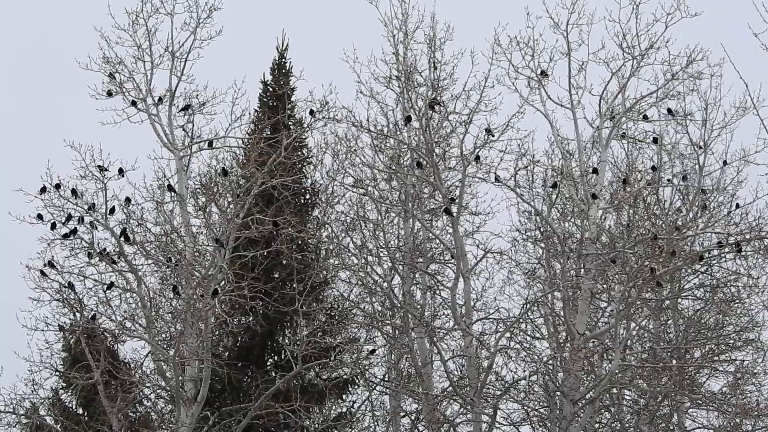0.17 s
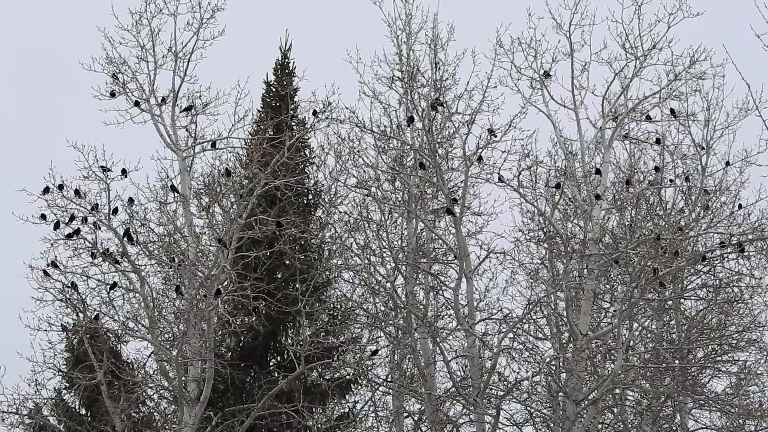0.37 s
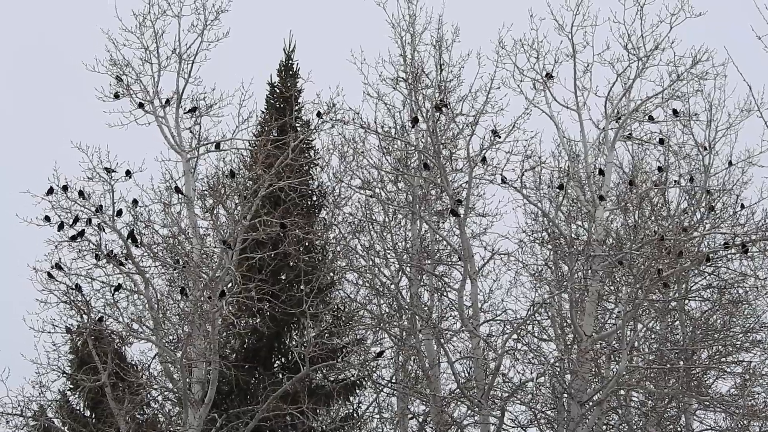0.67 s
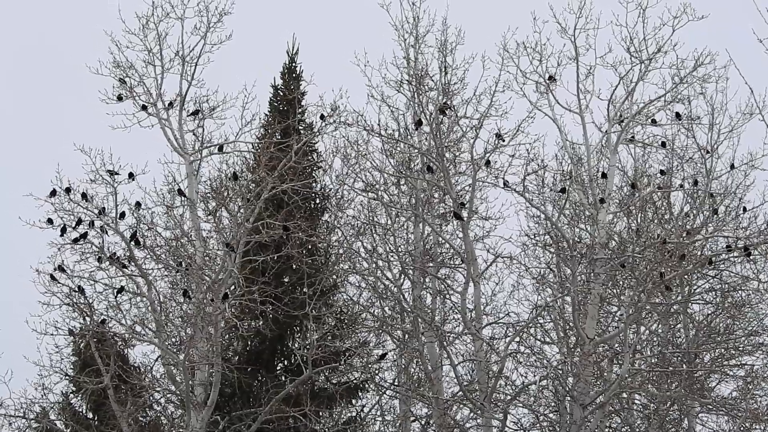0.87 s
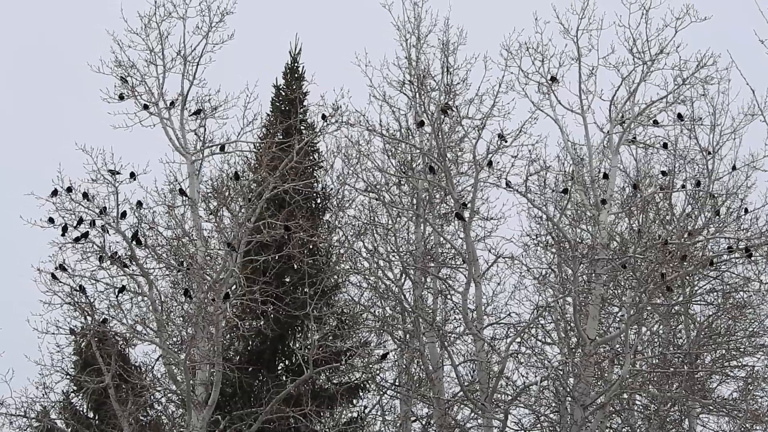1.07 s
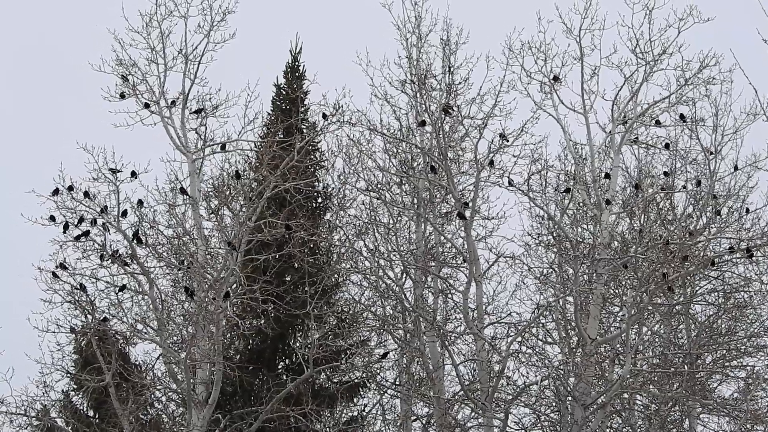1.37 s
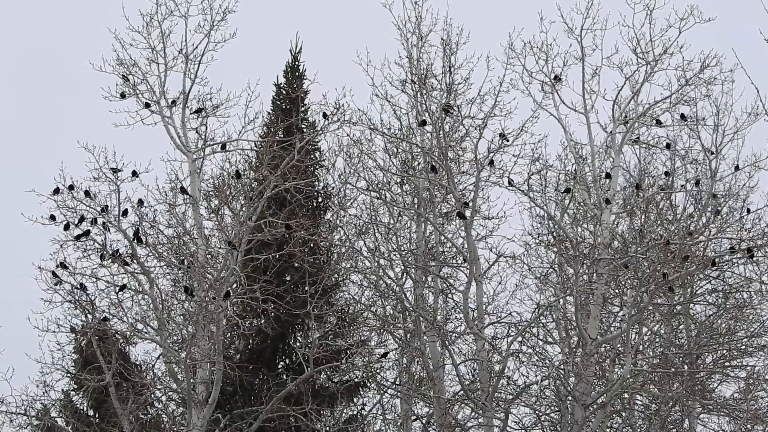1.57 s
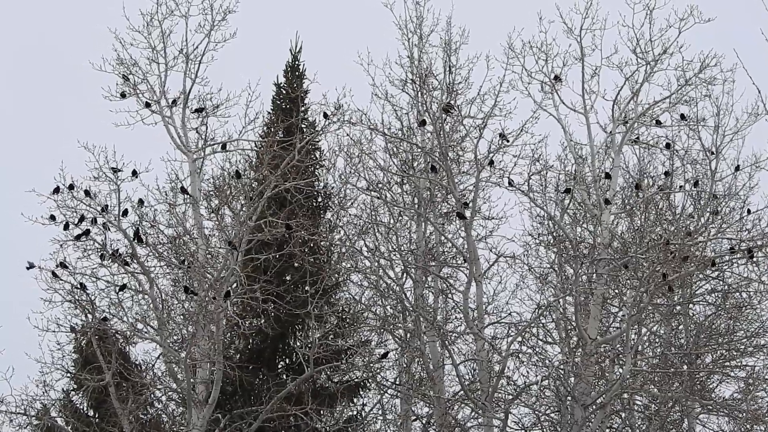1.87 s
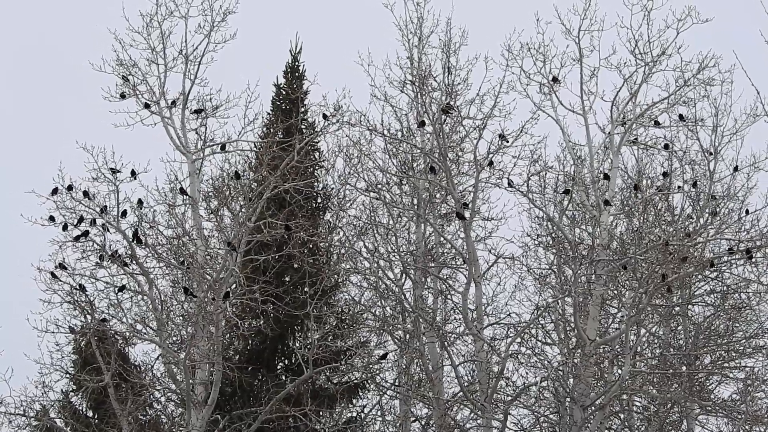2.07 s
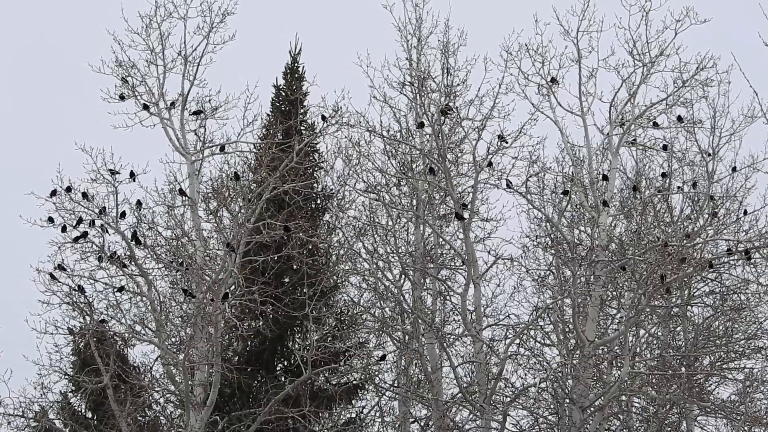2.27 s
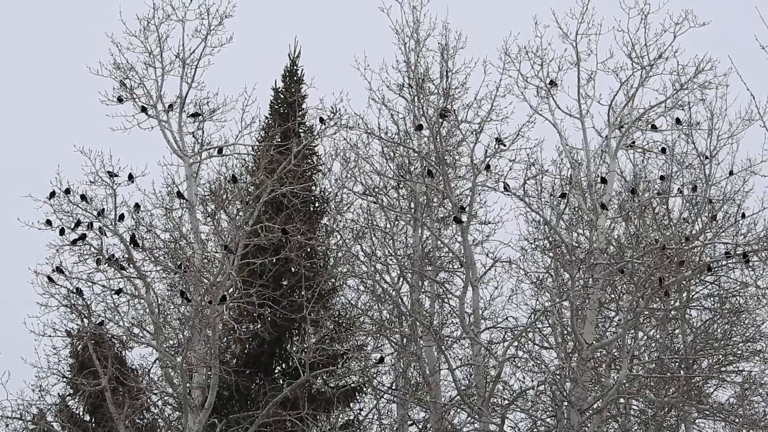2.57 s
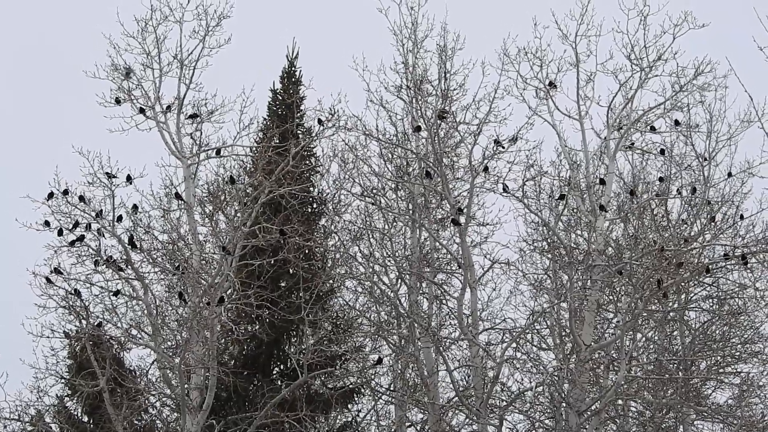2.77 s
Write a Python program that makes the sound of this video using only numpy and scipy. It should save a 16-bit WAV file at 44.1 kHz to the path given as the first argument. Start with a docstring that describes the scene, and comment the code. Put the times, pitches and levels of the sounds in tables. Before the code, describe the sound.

A dense blackbird flock chatters throughout, opening abruptly after a tiny silence. Sharp chips and liquid notes come first; overlapping falling whistles and rasps crowd 0.3-1.15 seconds. From 1.2 to 1.9 it thins to scattered pips and thin high rising whistles. Around 2.0 a rattle and rasps lead into a rapid trill until 2.5, then more slurred whistles near 2.6-2.9. Far chorus, short tree echoes and faint low rumble continue underneath.

```python
"""Blackbirds chattering in bare trees

A flock of blackbirds chatters some way from the microphones. Near birds slur, whistle, gurgle, pip
and trill in wavering tones with weak overtones; rasps are rows of ringing clicks, rattles fast chips.
Other birds call at random, the branches scatter the calls into short echoes, and the farthest voices
blur into a chorus of shaped noise. A faint distant rumble, also shaped noise, lies underneath.
"""
import sys
import numpy as np
from scipy import signal
from scipy.fft import rfft, irfft
from scipy.io import wavfile
from scipy.ndimage import uniform_filter1d

SR = 44100
rng = np.random.default_rng(int(sys.argv[2]) if len(sys.argv) > 2 else 0)


def wav_record(signal):
    """Record a signal, one row per channel, as 16-bit PCM in the file named by sys.argv[1]."""
    frames = np.transpose(np.atleast_2d(signal))
    bounded = np.clip(frames, -1, 1)
    # unit amplitude maps onto the largest positive 16-bit level
    quanta = np.round(bounded * 32767).astype(np.int16)
    wavfile.write(sys.argv[1], SR, quanta)


N = 129213  # length of the sound in samples

# All levels in the tables are relative ones, before the fades and the final mix.
# Bearing runs from -1 to 1; a positive one reaches the left microphone first.

# Long whistles, mostly falling: start_s, length_s, start_pitch_hz, knee_pitch_hz, middle_pitch_hz,
# end_pitch_hz, level_db, bearing
SLUR_WHISTLES = [(.272, .235, 4800, 3660, 3250, 3037, -29.5, -0.38),
                 (.325, .19, 4450, 4130, 3930, 3600, -28, .2),
                 (.503, .2, 3640, 3420, 3280, 3170, -27, 0.31),
                 (.685, 0.13, 4950, 4150, 3015, 2900, -27.5, 0),
                 (.781, .085, 4380, 4050, 3800, 3180, -26.5, -.4),
                 (.84, .065, 4900, 4600, 4250, 3850, -32, .2),
                 (.858, .05, 3380, 3340, 3300, 3200, -31.5, -.4),
                 (.897, .11, 4030, 3550, 3230, 2950, -26.5, 0),
                 (.972, .175, 3600, 3520, 3270, 3100, -26.5, .1),
                 (1.03, .1, 2900, 2870, 2800, 2733, -35, 0), (2.025, 0.1, 3770, 3520, 3110, 3006, -34, 0),
                 (2.12, 0.22, 3700, 3370, 3020, 2733, -30.5, .2),
                 (2.452, 0.0494, 3690, 3440, 3265, 3080, -35, -0.082),
                 (2.605, .17, 3640, 3430, 3300, 3320, -29, .1),
                 (2.656, .27, 5980, 4380, 4030, 3850, -28.5, -0.24),
                 (2.805, .06, 3900, 3520, 3230, 2950, -31.5, 0)]
# Thin high whistles, rising or falling: start_s, length_s, start_pitch_hz, knee_pitch_hz,
# middle_pitch_hz, end_pitch_hz, level_db, bearing
THIN_WHISTLES = [(.44, 0.32, 7750, 7260, 6850, 6400, -49, 0),
                 (.585, .245, 8200, 7880, 7600, 6950, -48.5, -.6),
                 (.85, 0.09, 7400, 7200, 7500, 7850, -49, -0.069),
                 (1.228, .1, 6400, 6900, 7280, 7450, -41.5, 0.4),
                 (1.328, .19, 6950, 7580, 7740, 7840, -37.5, 0.85),
                 (1.58, 0.099, 7950, 7800, 7550, 6900, -50, 0.068),
                 (1.84, 0.093, 5680, 5690, 5700, 5720, -37.5, 0.62),
                 (2.02, .28, 6800, 7170, 7560, 7970, -42.5, 0.5),
                 (2.8, 0.16, 6750, 6930, 7320, 7600, -38, -0.33)]
# Liquid notes, mostly low: start_s, length_s, pitch_hz, glide_octaves, level_db
LIQUID_NOTES = [(.06, .14, 2490, .03, -36.5), (.05, .16, 4950, 0, -33.5), (.085, 0.044, 1520, -0.11, -39),
                (.135, 0.067, 1360, -0.002, -41), (.22, 0.048, 2313, -0.056, -34),
                (.235, .075, 1350, -.1, -42), (.305, 0.12, 1421, -0.017, -37.5),
                (.35, 0.13, 1707, -0.0093, -44), (.7, .085, 1350, -0.061, -44),
                (.805, 0.027, 1290, 0.046, -45), (.91, 0.032, 1380, 0.026, -41),
                (.962, 0.037, 2200, -0.15, -29), (.995, 0.065, 2163, -0.013, -32.5),
                (1.07, 0.1, 1490, .15, -46), (1.155, 0.08, 2750, -0.016, -40.5),
                (1.183, 0.027, 2314, 0.072, -31), (1.31, 0.11, 1395, -.03, -46.5),
                (1.355, 0.034, 1610, 0.018, -45), (1.41, 0.075, 2213, -0.033, -36),
                (1.73, 0.061, 1413, 0.077, -48), (1.793, 0.037, 1843, .02, -38),
                (1.83, .12, 1915, .02, -48), (1.958, 0.019, 2174, 0.05, -31),
                (1.988, .025, 1814, 0.059, -37.5), (2.17, .06, 1665, -.06, -39),
                (2.23, 0.13, 1305, 0.03, -46), (2.23, 0.13, 1030, 0.066, -48.5),
                (2.425, .042, 2144, .02, -34.5), (2.437, .04, 1708, .03, -39.5), (2.49, .022, 2110, 0, -34),
                (2.553, .05, 1385, .02, -38), (2.605, .04, 1445, .05, -43),
                (2.705, 0.028, 2256, -0.077, -32.5), (2.812, 0.024, 1840, 0.02, -35),
                (2.823, .045, 1670, 0, -42)]
# Short pips and sharp chips: start_s, length_s, pitch_hz, glide_octaves, level_db
PIP_NOTES = [(.056, .008, 4980, -.1, -28), (.063, .014, 4570, -.03, -23.5), (.078, .008, 4850, .1, -25.5),
             (.082, .009, 3450, -.1, -28), (.085, .008, 4600, 0, -28), (.11, .022, 6450, .04, -36),
             (.11, .03, 3240, .06, -30), (.156, 0.0093, 5620, -0.33, -33), (.184, 0.019, 3260, 0.25, -27),
             (.248, 0.013, 3130, 0.16, -24.5), (.266, .011, 5400, -.4, -26), (.41, .032, 3150, -.02, -25.5),
             (.426, .01, 6530, -.25, -33), (.675, .014, 6120, -0.058, -26.5),
             (.721, 0.011, 4680, -0.031, -21.5), (.742, .03, 3040, -.04, -26),
             (.751, 0.0094, 6100, -0.2, -32), (.812, .012, 4500, -.45, -29), (.884, .011, 5700, -.4, -31),
             (.759, 0.0089, 4620, 0, -25.5), (.785, 0.042, 5650, -.08, -32), (.919, .013, 5580, .12, -26),
             (.929, .015, 5530, -.16, -27), (.951, .015, 5480, .08, -33), (.996, 0.019, 5620, -.07, -31),
             (1.018, .014, 5200, -0.19, -27), (1.06, .025, 3230, -0.0028, -27),
             (1.253, 0.025, 3120, -0.065, -29), (1.475, 0.029, 4740, 0, -31.5),
             (1.523, 0.0096, 5600, .2, -30), (1.542, .02, 3540, 0.09, -22.5),
             (1.61, 0.017, 4870, -0.012, -33), (1.647, 0.011, 5580, -0.43, -31),
             (1.688, 0.019, 3500, 0.094, -26.5), (1.837, 0.02, 3490, 0.035, -26.5),
             (1.945, 0.015, 3600, 0.071, -37), (1.996, .018, 7340, .17, -36),
             (1.979, .008, 4750, -.35, -28), (2.004, .011, 4620, -0.066, -25.5),
             (2.085, 0.0089, 5800, -0.31, -31), (2.183, .012, 6600, .35, -36),
             (2.25, .008, 5540, 0.23, -28), (2.352, 0.0091, 6360, .2, -38), (2.475, 0.014, 6400, .2, -35),
             (2.526, .009, 6200, -0.28, -37), (2.603, 0.01, 6880, 0.067, -37),
             (2.606, .016, 4720, 0, -27.5), (2.652, .014, 5680, .04, -29)]
# One bird's trill of hooked, slightly hoarse notes: start_s, length_s, pitch_hz, level_db
TRILL_NOTES = [(2.114, .015, 5200, -27.5), (2.136, .013, 4650, -27), (2.16, .014, 4900, -27),
               (2.185, .013, 5050, -28), (2.21, .014, 4700, -29), (2.236, .015, 4650, -25),
               (2.263, .015, 4620, -25.5), (2.292, .012, 4620, -27), (2.317, .017, 4660, -25),
               (2.347, .026, 4850, -29), (2.374, .013, 4850, -29.5), (2.401, .017, 4750, -31),
               (2.426, .011, 4900, -31), (2.456, .011, 4750, -32), (2.481, .013, 4680, -30)]
# Rattles, fast runs of steep downward chips: start_s, length_s, centre_hz, chips_per_s, level_db
RATTLE_RUNS = [(.085, .065, 4100, 120, -35.5), (2.02, .07, 4200, 106, -32.5)]
# Harsh rasps: start_s, length_s, centre_hz, spread_octaves, clicks_per_s, level_db
RASP_CALLS = [(.52, .22, 2500, .1, 170, -38), (0.792, .11, 4700, 0.11, 136, -36),
              (0.898, 0.14, 3210, .12, 133, -32.5), (2.0, .115, 4650, .03, 134, -32.5),
              (2.11, 0.11, 3400, 0.046, 143, -42), (2.14, .14, 5200, .13, 120, -38),
              (2.41, 0.072, 3400, 0.17, 125, -36.5), (2.854, 0.093, 3070, 0.14, 140, -33)]
# Groups of birds in the unseen flock: calls_per_s, pitch_hz, spread_octaves, length_s,
# glide_octaves, level_db
FLOCK_GROUPS = [(54.96, 3250, 0.1204, 0.01764, 0.16, -37), (39.6, 4780, 0.053, 0.0123, 0.093, -35.5),
                (60, 5600, 0.133, 0.01007, 0.233, -38.5), (19.95, 2450, .12, .025, 0.1, -41),
                (7.95, 1450, 0.23, .05, 0.079, -49.5), (14, 6800, .06, 0.0117, .12, -46.5)]
# Tone colour of the far chorus: frequency_hz, level_db_per_hz
CHORUS_COLOUR = [(700, -41), (1200, -15.5), (1800, -13.5), (2300, -7.5), (2700, -5), (3200, -0.5),
                 (3550, -2), (4000, -8), (4400, -5), (4800, -5), (5300, -11.5), (6400, -12), (7200, -23.5),
                 (8300, -31.5), (9500, -41), (12000, -45), (15500, -53)]
# Swells of the far chorus: time_s, middle_band_db, treble_db
CHORUS_SWELLS = [(.05, -32.5, -31), (.21, -36.5, -41.5), (.3, -33.5, -34), (.47, -35.5, -38.5),
                 (.6, -32.5, -33), (.72, -32, -35.5), (.85, -30.5, -32), (1.0, -31.5, -31),
                 (1.1, -34, -36.5), (1.22, -36.5, -39), (1.33, -35, -33), (1.45, -34, -37.5),
                 (1.64, -34.5, -32), (1.76, -36, -40.5), (1.83, -34, -33), (1.92, -36.5, -35.5),
                 (2.07, -33, -33), (2.3, -33, -37.5), (2.46, -32.5, -34.5), (2.57, -31.5, -38),
                 (2.75, -36.5, -32), (2.92, -29, -37)]
# Tone colour of the rumble: frequency_hz, level_db_per_hz
RUMBLE_COLOUR = [(15, -62), (25, -31), (59, -7.5), (139, -6), (172, -0.5), (216, 0.5), (368, -5.5),
                 (461, -5.5), (500, -6), (638, -7), (911, -13.5), (1200, -18), (1560, -24), (2640, -120)]
# How alike the left and right noise are: frequency_hz, likeness (1 = the same)
LEFT_RIGHT_LIKENESS = [(30, .75), (70, 0.93), (150, 0.99), (400, 1), (800, 0.94), (2500, 0.91),
                       (3500, 0.92), (5000, 0.74), (8000, 0.3), (12000, 0.4)]

EAR_GAP_S = 3e-5  # arrival difference between the microphones for a bird at the side
EARS = np.array([[.5], [-.5]])  # left, right
# unsteady voice: pitch waver as a share of the pitch, loudness flutter; random points per second
WAVER, WAVER_HZ, FLUTTER_DB, FLUTTER_HZ = .0059, 138, 2.2, 76.2
# overtones: level in the slurs and elsewhere, and their own flicker
SLUR_OVERTONE_DB, OVERTONE_DB, OVERTONE_FLICKER_DB, OVERTONE_FLICKER_HZ = -38, -43, 4, 45
PURE_HZ, PURE_DB_PER_HZ = 4350, .008  # voices above this pitch turn purer
THIRD_DB, DULL_HZ, DULL_DB_PER_HZ = -6, 11500, .005  # third harmonic: weaker, dying away above DULL_HZ
KNEE, ATTACK_S, RELEASE_S = .2, .008, .014  # knee as a share of the whistle's length
SLUR_FADE_DB, THIN_FADE_DB = -6, 1  # level change over a whistle
PIP_BEND, PIP_ROUGH = .15, .012  # curl and pitch jitter in octaves
TRILL_HOOK, TRILL_ROUGH, ROUGH_HZ = .45, .012, 900  # the same for the trill; jitter points per second
CHIP_S, CHIP_GLIDE, CHIP_SPREAD = .0085, -.8, .1  # glide and spread in octaves
RASP_WIDTH_HZ, RASP_JITTER = 1000, .15  # jitter as a share of the click spacing
FLOCK_SPREAD_DB = 2.2
TREES_T60_S, TREES_LIKENESS = .43, .83  # time to die away by 60 dB; left-right likeness
RUMBLE_DB = -39.5
START_S, FADE_IN_S, EDGE_HZ = .045, .017, 15750


def amp(db):
    """Turns decibels into a gain."""
    return 10 ** (np.asarray(db) / 20)


def unit(x):
    """Scales a sound to an average (rms) size of 1."""
    return x / np.sqrt(np.mean(x ** 2) + 1e-20)


def add(mix, start, sound):
    """Mixes a stereo sound in at a time in seconds."""
    part = mix[:, max(round(start * SR), 0):][:, :sound.shape[1]]
    part += sound[:, :part.shape[1]]


def wander(t, rate):
    """Random curve of about unit size: straight lines between chance points."""
    return np.interp(t * rate, np.arange(128), rng.standard_normal(128))


def whistle(t, hz, level, bearing, overtone_db):
    """A nearly pure, slightly unsteady tone with weak, flickering overtones, at both microphones."""
    hz = hz * (1 + WAVER * wander(t, WAVER_HZ))
    phase = 2 * np.pi * (np.cumsum(hz) / SR + EARS * bearing * EAR_GAP_S * hz)
    third_db = THIRD_DB - DULL_DB_PER_HZ * np.maximum(3 * hz - DULL_HZ, 0)
    fits = hz < SR / 6  # no third harmonic above the highest frequency the sound can hold
    third = amp(third_db) * np.sin(3 * phase) * fits
    flicker_db = OVERTONE_FLICKER_DB * wander(t, OVERTONE_FLICKER_HZ)
    pure_db = PURE_DB_PER_HZ * np.maximum(hz - PURE_HZ, 0)
    overtones = (np.sin(2 * phase) + third) * amp(overtone_db + flicker_db - pure_db)
    flutter = amp(FLUTTER_DB * wander(t, FLUTTER_HZ))
    return np.sqrt(2) * (np.sin(phase) + overtones) * level * flutter


def glides(table, fade_db, overtone_db):
    """Long whistles that bend smoothly through four pitches."""
    out = np.zeros((2, N))
    for start, length, *pitches, db, bearing in table:
        t = np.arange(0, length, 1 / SR)
        hz = np.interp(t / length, [0, KNEE, .5, 1], pitches)
        hz = uniform_filter1d(hz, size=len(t) // 5, mode="nearest")  # round the corners
        gate = np.minimum(t / ATTACK_S, 1) * np.minimum((length - t) / RELEASE_S, 1)
        level = gate * amp(db + fade_db * t / length)
        add(out, start, whistle(t, hz, level, bearing, overtone_db))
    return out


def note(length, hz, glide, db, bearing, hook=0, rough=0):
    """One short rounded note that glides through its pitch; it may curl at the ends and be hoarse."""
    t = np.arange(0, length, 1 / SR)
    u = t / length - .5  # position from the middle of the note
    swell = abs(np.sin(np.pi * t / length)) ** .43 * signal.windows.tukey(len(t), .2)
    octaves = glide * u + hook * u ** 2 + rough * wander(t, ROUGH_HZ)
    return whistle(t, hz * 2 ** octaves, swell * amp(db), bearing, OVERTONE_DB)


def notes(table, bend=0, rough=0):
    """Short notes from birds scattered over the trees, each with its own chance curl."""
    out = np.zeros((2, N))
    for start, *row in table:
        bearing = rng.uniform(-.72, .4)
        hook = bend * rng.standard_normal()
        add(out, start, note(*row, bearing, hook, rough))
    return out


def trill():
    """One bird repeats a note that dips and curls up again."""
    out = np.zeros((2, N))
    for start, length, hz, db in TRILL_NOTES:
        add(out, start, note(length, hz, 0, db, -.2, TRILL_HOOK, TRILL_ROUGH))
    return out


def rattles():
    """Chips follow so fast that they fuse into a chatter."""
    out = np.zeros((2, N))
    for start, length, centre_hz, rate, db in RATTLE_RUNS:
        for chip_start in np.arange(start, start + length, 1 / rate):
            hz = centre_hz * 2 ** (CHIP_SPREAD * rng.standard_normal())
            add(out, chip_start, note(CHIP_S, hz, CHIP_GLIDE, db, .2, rough=TRILL_ROUGH))
    return out


def rasps():
    """Harsh calls: an uneven train of clicks, each ringing briefly near the call's pitch."""
    out = np.zeros((2, N))
    t = np.arange(200) / SR
    click_shape = t ** 2 * np.exp(-np.pi * RASP_WIDTH_HZ * t)
    for start, length, centre_hz, spread, rate, db in RASP_CALLS:
        call = np.zeros((2, round(length * SR)))
        # 40 clicks are more than any call holds; the surplus falls past its end
        for k, (late, bend, bearing) in enumerate(rng.standard_normal((40, 3))):
            hz = centre_hz * 2 ** (spread * np.clip(bend, -1.5, 1.5))
            ring = np.sin(2 * np.pi * hz * (t + EARS * EAR_GAP_S * bearing * .5))
            add(call, (k + RASP_JITTER * late) / rate, ring * click_shape)
        rounded = call * signal.windows.tukey(call.shape[1], .5)
        add(out, start, amp(db) * unit(rounded))
    return out


def flock():
    """Farther birds pipe and chip at random moments."""
    out = np.zeros((2, N))
    for rate, hz, spread, length, glide, db in FLOCK_GROUPS:
        starts = np.cumsum(rng.exponential(1, size=200)) / rate
        chances = np.clip(rng.standard_normal((len(starts), 5)), -2, 2)
        for start, (pitch, long, bend, loud, bearing) in zip(starts, chances):
            call_s = length * 2 ** (.5 * long)
            call_hz = hz * 2 ** (spread * pitch)
            call_db = db + FLOCK_SPREAD_DB * loud
            add(out, start, note(call_s, call_hz, glide * bend, call_db, .68 * bearing))
    return out


def trees(x):
    """Trunks and branches scatter each call into a short diffuse tail of sparse random echoes."""
    t = np.arange(SR // 2) / SR
    echoes = rng.standard_normal((2, len(t))) * (rng.random((2, len(t))) < .1)
    mid, side = echoes * amp(-60 * t / TREES_T60_S) * np.minimum(t / .0079, 1)  # builds up, dies away
    shared = mid * np.sqrt(1 + TREES_LIKENESS)
    tail = shared + np.array([[1], [-1]]) * side * np.sqrt(1 - TREES_LIKENESS)
    return signal.fftconvolve(x, tail / np.linalg.norm(tail[0]), axes=1)[:, :N]


def read(points, hz):
    """Reads a frequency table between its points on a log-frequency axis."""
    f, value = np.transpose(points)
    return np.interp(np.log(hz + 1), np.log(f + 1), value)


def blotches(shape, bands, frames):
    """Random map of loudness, smoothed over some frequency bands and time frames."""
    across = uniform_filter1d(rng.standard_normal(shape), size=bands, axis=0)
    return unit(uniform_filter1d(across, size=frames, axis=1))


def noise(spectrum, patch_db, flicker_db):
    """Stereo noise of a given colour, with small patches and a flicker shared by wide bands."""
    shape = (257, N // 128 + 6)  # frequency bands, time frames
    loudness_db = patch_db * blotches(shape, 4, 7) + flicker_db * blotches(shape, 40, 4)
    z = rng.standard_normal((2, *shape)) + 1j * rng.standard_normal((2, *shape))
    raw = signal.istft(z * amp(loudness_db), nperseg=512, noverlap=384)[1][:, :N]
    mid, side = rfft(raw)
    f = np.fft.rfftfreq(N, 1 / SR)
    same = np.clip(read(LEFT_RIGHT_LIKENESS, f), -1, 1)
    mid, side = mid * np.sqrt(1 + same), side * np.sqrt(1 - same)
    stereo = np.array([mid + side, mid - side])
    return unit(irfft(stereo * amp(read(spectrum, f)), N))


def chorus():
    """The farthest voices merge into a wash of noise whose middle and treble swell separately."""
    s, middle_db, treble_db = np.transpose(CHORUS_SWELLS)
    t = np.arange(N) / SR
    wash = noise(CHORUS_COLOUR, patch_db=2.5, flicker_db=2)
    middle = signal.sosfiltfilt(signal.butter(6, 4100, fs=SR, output="sos"), wash)
    treble = wash - middle
    middle_gain = amp(np.interp(t, s, middle_db) - 1)
    treble_gain = amp(np.interp(t, s, treble_db) - 1)
    return unit(middle) * middle_gain + unit(treble) * treble_gain


def rumble():
    """A faint distant rumble: mostly low noise with slight patches and flicker."""
    return amp(RUMBLE_DB) * noise(RUMBLE_COLOUR, patch_db=1.3, flicker_db=.84)


def scene():
    """Near birds, the flock and the echoes, the far chorus and the rumble."""
    slurs = glides(SLUR_WHISTLES, SLUR_FADE_DB, SLUR_OVERTONE_DB)
    near = slurs + notes(PIP_NOTES, PIP_BEND, PIP_ROUGH) + rasps() + rattles()
    thin = glides(THIN_WHISTLES, THIN_FADE_DB, OVERTONE_DB)
    liquid, trilled, far = notes(LIQUID_NOTES), trill(), flock()
    into_trees = amp(-7.5) * near + amp(-16.5) * thin + amp(-8) * liquid
    into_trees += amp(-4) * far + amp(-9) * trilled
    direct = near + thin + trilled + amp(-.5) * liquid + amp(-3) * far
    birds = direct + trees(into_trees) + chorus()
    return birds * amp([[.25], [-.25]]) + rumble()  # birds a touch louder on the left


def record(dry):
    """The sound opens after a moment of silence; then the highest frequencies are cut off."""
    opened = dry * np.clip((np.arange(N) / SR - START_S) / FADE_IN_S, 0, 1)
    low_pass = signal.firwin(511, EDGE_HZ, window=("kaiser", 9), fs=SR)
    return signal.oaconvolve(opened, low_pass[None], "same")


dry = scene()
out = record(dry)
wav_record(out)
```